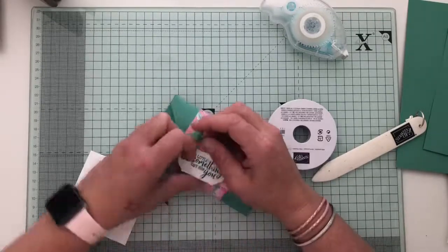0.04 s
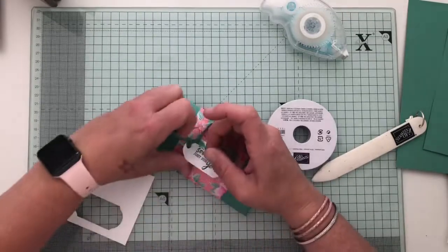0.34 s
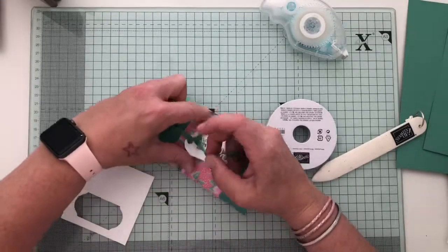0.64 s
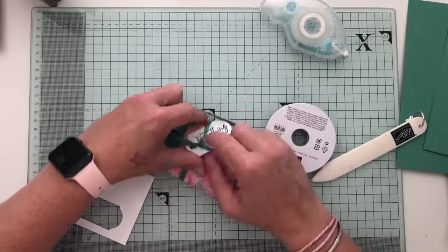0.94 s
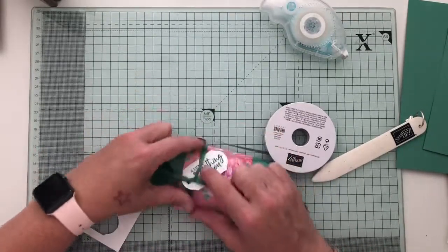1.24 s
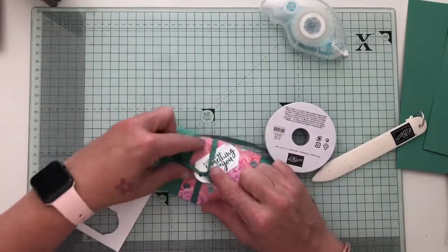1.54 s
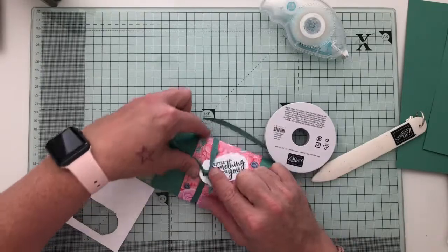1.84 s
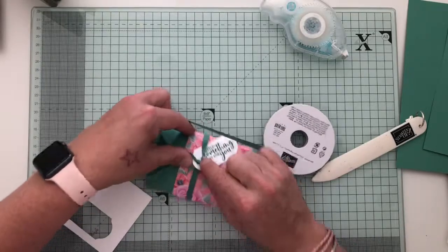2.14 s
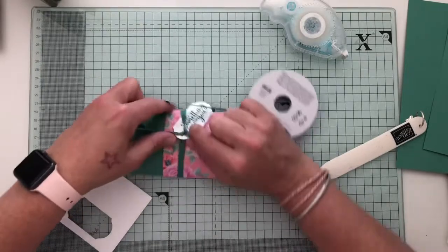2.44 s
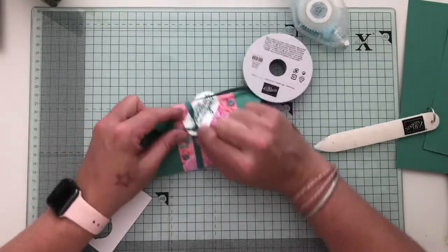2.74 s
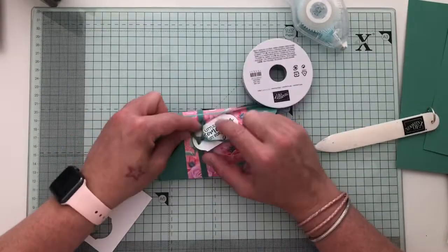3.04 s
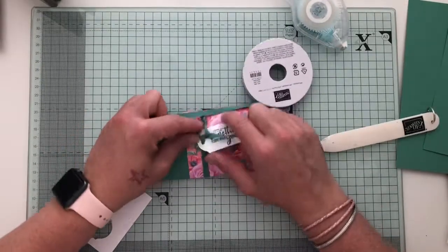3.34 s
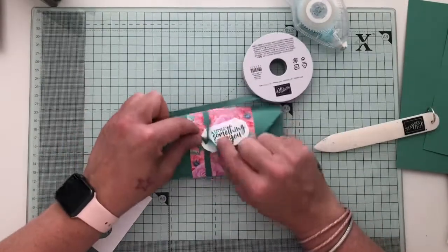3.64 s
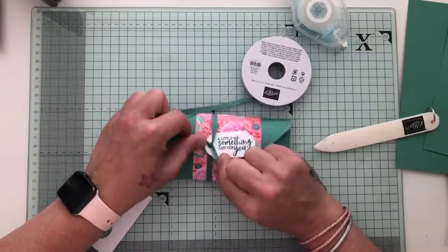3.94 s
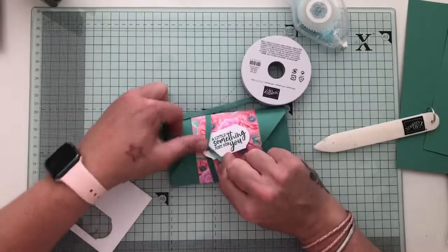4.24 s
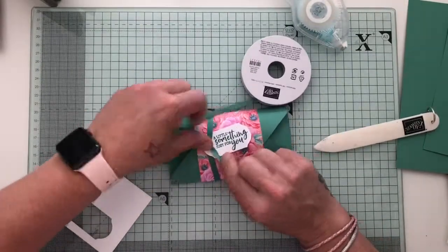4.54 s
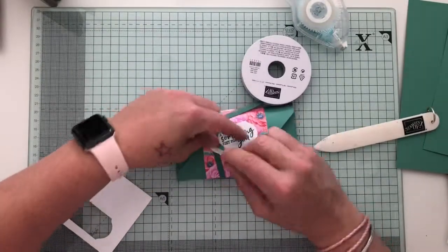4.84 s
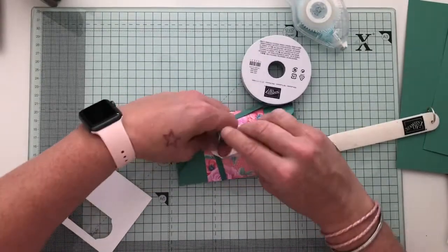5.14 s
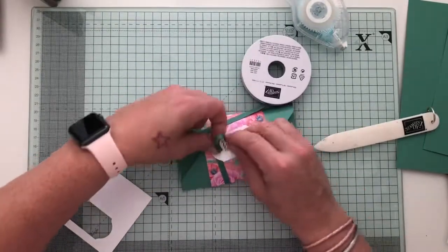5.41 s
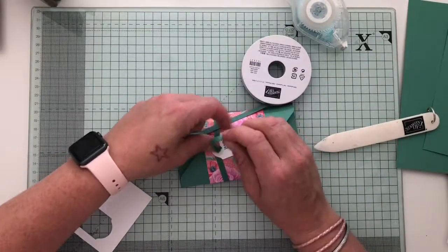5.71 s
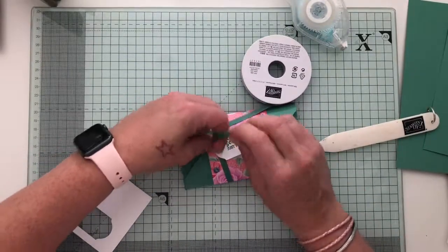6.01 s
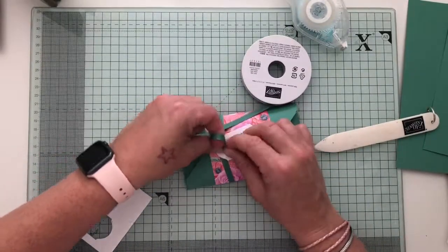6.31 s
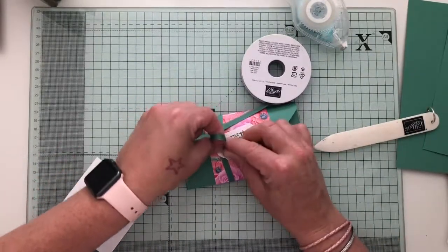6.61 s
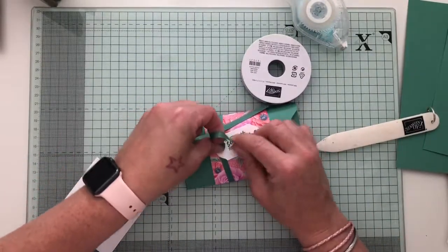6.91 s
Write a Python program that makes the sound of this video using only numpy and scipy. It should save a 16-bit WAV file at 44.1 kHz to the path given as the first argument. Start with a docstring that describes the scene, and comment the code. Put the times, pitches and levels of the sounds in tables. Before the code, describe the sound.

Hands tie ribbon around a card box, rustling and tapping, while something plastic ticks and clacks down three times.

```python
"""A small, dry room: close to the microphone, hands tie a ribbon round a card box on a cutting mat.
Stick-slip friction makes card and ribbon rub and crackle. The box knocks on the table, whose top booms
in its low modes, and card edges snap off fingernails. Something of hard plastic, probably the ribbon
spool, ticks as it is tugged and three times clacks down sharply, ringing in damped free vibration."""
import sys
import numpy as np
from scipy import signal
from scipy.fft import rfft, irfft, next_fast_len
from scipy.io import wavfile
from scipy.ndimage import map_coordinates

SR = 44100
rng = np.random.default_rng(int(sys.argv[2]) if len(sys.argv) > 2 else 0)


def wav_record(signal):
    """Record a signal, one row per channel, as 16-bit PCM in the file named by sys.argv[1]."""
    frames = np.transpose(np.atleast_2d(signal))
    bounded = np.clip(frames, -1, 1)
    # unit amplitude maps onto the largest positive 16-bit level
    quanta = np.round(bounded * 32767).astype(np.int16)
    wavfile.write(sys.argv[1], SR, quanta)


N = 316197
T = np.arange(SR // 3) / SR  # time within one contact, t/s

# Levels in the tables are relative; each source applies its own gain.
# spectrum of the room's background: f/Hz, level/dB
AIR_SPECTRUM = [(15, -42.5), (25, -0.5), (80, 4), (354, -0.5), (863, -8.5), (1040, -3.5), (1160, -15.5),
                (1260, -7), (2000, -18.5), (2550, -10), (2840, -17), (11600, -22.5), (14800, -18),
                (16000, -22.5)]
# faint rub of the hands holding the box: t/s, level/dB
HOLDING_LEVELS = [(0, -65.5), (.95, -72), (1.3, -64), (2.85, -61.5), (3.1, -76), (4.3, -76.5), (5, -78),
                  (5.6, -74.5), (6.2, -80.5), (7.17, -88)]
# finger slides over card and ribbon: start t/s, duration/s, rub level/dB, hiss level/dB
FINGER_SLIDES = [(-0.03, 0.11, -55.5, -68), (0.143, .15, -59.5, -60), (0.497, .34, -60.5, -63.5),
                 (0.991, 0.27, -58.5, -60), (1.317, 0.07, -58, -59.5), (1.45, 0.16, -74, -60),
                 (1.7, 0.14, -83, -61), (1.877, 0.41, -55.5, -58.5), (2.365, 0.26, -54.5, -56.5),
                 (2.675, 0.086, -62.5, -52), (2.754, 0.21, -53, -56), (2.968, 0.11, -64, -60.5),
                 (3.126, 0.33, -64.5, -60), (3.544, 0.23, -63.5, -64.5), (3.808, 0.35, -66.5, -71),
                 (4.055, 0.1, -78.5, -62.5), (4.39, 0.13, -66, -70), (4.684, 0.15, -76, -73),
                 (5.183, 0.18, -65.5, -78.5), (5.307, 0.16, -64, -68), (5.48, 0.054, -66.5, -78),
                 (5.69, 0.11, -67.5, -68.5), (5.805, 0.14, -63.5, -75.5), (5.942, 0.14, -63, -66),
                 (6.326, 0.095, -67, -80), (6.663, 0.28, -75.5, -75), (6.976, 0.25, -72.5, -70)]
# quick pulls of ribbon over a card edge: middle t/s, half duration/s, level/dB
RIBBON_PULLS = [(0.586, 0.019, -53.5), (0.649, 0.019, -50), (0.819, 0.014, -57.5), (1.735, 0.012, -54.5),
                (2.139, 0.04, -50), (2.443, 0.028, -43), (6.57, 0.022, -64), (6.856, 0.041, -67.5)]
# friction spectra of skin on card, ribbon on card and ribbon over an edge: f/Hz, level/dB
SKIN_SPECTRUM = [(50, -38), (110, -3.5), (230, -9), (330, -2.5), (420, -5), (560, -2.5), (800, -6.5),
                 (1200, -4), (1800, -10.5), (2800, -12.5), (5000, -46)]
RIBBON_SPECTRUM = [(700, -35.5), (1500, -2), (2200, -7), (2650, -10.5), (3200, -3.5), (3700, -6),
                   (4500, -2.5), (6500, -5.5), (8500, -8.5), (11000, -10.5), (15500, -13)]
PULL_SPECTRUM = [(60, -42), (200, -8), (700, 2.5), (1400, 3.5), (4500, 1), (7000, -1), (10000, -12),
                 (15000, -12)]
# knocks: the box meets the mat, or (at 0.034 s and 0.985 s) a fingertip taps it: t/s, card level/dB, thud
# level/dB, centre f/Hz
KNOCKS = [(0.034, -55, -84, 1190), (0.51, -51, -62, 930), (0.985, -51.5, -62, 704),
          (1.147, -36.5, -42.5, 2190), (1.579, -64, -51, 690), (1.661, -49.5, -54.5, 610),
          (1.8936, -44.5, -43.5, 626), (2.173, -31, -40.5, 760), (2.488, -40.5, -45.5, 464),
          (2.577, -45, -62, 980), (2.608, -51, -76, 1100), (2.839, -46, -50, 665),
          (2.928, -50, -62, 1500), (2.97, -54, -66, 900), (4.069, -42, -62.5, 779),
          (5.003, -48, -72, 1000), (6.015, -59.5, -71, 824), (6.217, -59, -65.5, 1520),
          (6.589, -58, -67.5, 653), (7.096, -60, -78.5, 454)]
# impact spectra of the box wall, an edge and the table top: f/Hz, level/dB
WALL_SPECTRUM = [(90, -65), (200, -21.5), (400, -1.5), (750, -7), (1000, 5.5), (1500, -1.5), (2150, -10),
                 (2900, -5), (4200, -15.5), (8000, -45)]
EDGE_SPECTRUM = [(500, -61), (1500, -29), (3000, 1.5), (4800, -4), (7000, -7.5), (10000, -15.5),
                 (15000, -19)]
TABLETOP_SPECTRUM = [(40, -58), (80, -19.5), (120, -1), (170, -4), (220, 0), (300, -1), (410, -11.5),
                     (510, -7.5), (700, -1), (900, -14), (1600, -39.5)]
# low modes of the table top: f/Hz, level/dB, t60/s
TABLETOP_MODES = [(144, -6.5, 0.37), (215.2, -6.5, 0.24), (285, -2, 0.1), (338, 1, 0.2), (514, -5.5, 0.13),
                  (676.5, -0.5, 0.14)]
# early reflections from table and walls: delay/s, level/dB
REFLECTIONS = [(.0026, -9), (.0045, -11.5), (.0073, -15.5)]
# reverberation time of the room: f/Hz, t60/s
REVERB_TIMES = [(150, .42), (400, 0.23), (1000, 0.2), (2800, 0.3), (7300, 0.24), (15000, 0.21)]
# snaps of card on fingernails: t/s, click level/dB, body level/dB
CARD_SNAPS = [(0.172, -42, -52), (0.5029, -39, -46.5), (0.7944, -34, -57.5), (1.9265, -30, -49),
              (2.0362, -34.5, -72), (2.386, -43, -48.5), (2.4178, -33, -54), (2.4302, -27.5, -51),
              (2.441, -25.5, -46), (2.488, -34, -34), (3.4148, -35.5, -59), (3.4259, -24.5, -32),
              (3.693, -35, -50), (3.9138, -37, -51), (5.003, -46, -49), (5.606, -35, -47.5),
              (6.341, -41.5, -47.5), (6.5524, -43.5, -54.5), (6.994, -49, -69.5)]
# spectra of a snap's click and body: f/Hz, level/dB
NAIL_SPECTRUM = [(500, -61.5), (1500, -27.5), (3000, -2), (5000, -1.5), (7500, -3), (10500, -7.5),
                 (15000, -9)]
SNAP_BODY_SPECTRUM = [(40, -14), (120, -23), (350, 2.5), (700, 4), (1500, -1), (2600, 0), (4500, -15)]
# hard blows of the plastic: t/s, ring and boom level/dB, body level/dB, treble level/dB
PLASTIC_CLACKS = [(1.092, -3, -18.5, -13), (3.487, -15.5, -27, -28), (4.44, -16.5, -28.5, -30.5)]
# spectra of a clack's body and treble: f/Hz, level/dB
CLACK_BODY_SPECTRUM = [(60, -43.5), (150, -29), (400, -23), (700, -7.5), (1200, -3), (2200, -5),
                       (3200, -1.5), (4000, -9.5), (5000, -17.5), (8000, -45)]
CLACK_TREBLE_SPECTRUM = [(1000, -60), (2400, -25.5), (4000, -9), (5200, -3.5), (6500, -3.5), (8400, -5),
                         (9400, -6.5), (10200, -8), (12300, -14), (13300, -14), (15500, -14)]
# modes of the plastic struck hard: f/Hz, level/dB, t60/s
PLASTIC_MODES = [(1280, -10, 0.16), (1630, -8.5, 0.11), (2174, -2.5, 0.13), (3100, -4.5, 0.081),
                 (3190, 6, 0.051), (4040, -8.5, 0.022), (4676, -4.5, 0.035), (5170, 0.5, 0.017),
                 (6200, 3, 0.069), (5770, -8, 0.037), (6440, -4.5, 0.017), (6770, -4.5, 0.017),
                 (6930, -5, 0.12), (7780, -8.5, 0.036), (7540, -6, 0.069), (7900, -6, 0.044),
                 (8320, 2.5, 0.027), (9980, -5, 0.075), (11430, -15.5, 0.1), (11700, -6.5, .07)]
# light ticks of the plastic: t/s, tick level/dB, body level/dB, pitch f/Hz
PLASTIC_TICKS = [(1.314, -50, -54, 3200), (1.355, -47.5, -54, 3040), (1.4657, -47, -60, 3180),
                 (1.5098, -46, -72, 3200), (1.5777, -41, -46.5, 3260), (1.6586, -42.5, -59, 3150),
                 (1.7504, -45, -70, 3020), (1.8382, -49.5, -66, 3110), (1.8954, -35, -48, 3200),
                 (2.0802, -42.5, -45, 3030), (2.5443, -39.5, -61, 3780), (2.5654, -37, -53, 3040),
                 (2.657, -38, -54, 3770), (2.665, -32, -48, 3320), (2.6993, -35, -49, 3920),
                 (2.8402, -33, -37, 3370), (2.9438, -43, -48.5, 3200), (2.9864, -35, -59, 3200),
                 (3.031, -44.5, -57, 3140), (3.0515, -40.5, -45, 3300), (3.7124, -44, -46, 3335),
                 (3.889, -36.5, -40.5, 3350), (4.4634, -34.5, -44, 3340), (4.4814, -41.5, -43, 3230),
                 (4.582, -34, -44.5, 3290), (4.6024, -38.5, -44, 3290)]
# modes of the plastic barely touched: ratio to the pitch, level/dB, t60/s
TICK_MODE_RATIOS = [(.94, -7, .026), (.98, -2, .03), (1.01, 0, .032), (1.06, -6, .024), (1.2, -12, .018)]
# spectra of a tick's scratch and body: f/Hz, level/dB
TICK_SCRATCH_SPECTRUM = [(800, -64), (1800, -14), (2600, -14), (3200, -5), (3900, -18), (4600, -15.5),
                         (9000, -49)]
TICK_BODY_SPECTRUM = [(80, -28), (300, -18), (700, 5.5), (1200, 6), (2200, 9.5), (2600, 1), (4000, -28)]


def amp(db):
    """Amplitude ratio of a level in decibels."""
    return 10 ** (np.asarray(db) / 20)


def unit(x):
    """Normalisation to rms 1."""
    return x / np.sqrt(np.mean(x ** 2) + 1e-20)


def unit_onset(x):
    """Normalisation of a contact to rms 1 over its first 10 ms."""
    return x / np.sqrt(np.mean(x[:SR // 100] ** 2) + 1e-20)


def along(points, hz):
    """Interpolation of (f/Hz, value) points on a logarithmic frequency axis."""
    f, values = np.transpose(points)
    return np.interp(np.log(hz + 1), np.log(f + 1), values)


def add(track, s, sound):
    """Superposition of a sound on the track from time s."""
    start = max(round(s * SR), 0)
    track[start:start + len(sound)] += sound[:N - start]


def fade(t, t60):
    """Exponential damping: 60 dB of decay in t60 seconds."""
    return np.exp(-np.log(1000) * t / t60)


def coloured(x, spectrum):
    """Minimum-phase filtering: folding the cepstrum makes the given gain curve causal."""
    m = 2 * next_fast_len(len(x) // 2 + 2048)
    gain = amp(along(spectrum, np.fft.rfftfreq(m, 1 / SR)))
    cepstrum = irfft(np.log(gain + 1e-6), m)
    cepstrum[1:m // 2] *= 2
    cepstrum[m // 2 + 1:] = 0
    return irfft(rfft(x, m) * np.exp(rfft(cepstrum)), m)[:len(x)]


def room_air():
    """Stationary noise: the quiet room and the microphone's own hiss, the deepest bass rolled off."""
    air = coloured(rng.standard_normal(N), AIR_SPECTRUM)
    high_pass = signal.butter(4, 36, "high", fs=SR, output="sos")
    return amp(-69.5) * unit(signal.sosfilt(high_pass, air))


def slide(t, length, attack_s=0.02, release_s=0.019, droop_db=1):
    """Envelope of one slide: linear attack, slightly sinking hold, exponential release."""
    attack = np.clip(t / attack_s, 0, 1)
    hold = amp(-droop_db * (np.clip(t / length, 0, 1) - .5))
    return attack * hold * np.exp(-np.maximum(t - length, 0) / release_s)


def wobble(knots_per_s):
    """Smooth random fluctuation: a spline through Gaussian knots."""
    knots = rng.standard_normal(int(N * knots_per_s / SR) + 4)
    return map_coordinates(knots, [np.arange(N) * knots_per_s / SR])


def stick_slips(per_second, centre_hz, spread, cycles):
    """Stick-slip motion: each release rings for a few cycles at a pitch of its own."""
    out, t = np.zeros(N), T[:SR // 30]
    for when, pitch, size, phase in rng.random((round(per_second * N / SR), 4)):
        hz = centre_hz * 2 ** (spread * np.arcsin(2 * pitch - 1))
        age = t * hz / cycles
        envelope = size ** 2 * age * np.exp(-age)
        add(out, when * N / SR, envelope * np.sin(2 * np.pi * (hz * t + phase)))
    return unit(out)


def crackle(spectrum, per_second, grain_share):
    """Friction as shot noise: fibres catch and let go in tiny bursts, over smooth noise."""
    catches = (rng.random(N) < per_second / SR) * rng.exponential(size=N)
    grains = signal.fftconvolve(catches, fade(T, t60=0.029))[:N] * rng.standard_normal(N)
    return unit(coloured(rng.standard_normal(N) + grain_share * unit(grains), spectrum))


def rubbing():
    """Sliding friction: skin on card rubs softly; ribbon hisses, catches and swells in quick pulls."""
    t = np.arange(N) / SR
    holding = amp(np.interp(t, *np.transpose(HOLDING_LEVELS)))
    power = sum(np.outer(amp([rub_db, hiss_db]), slide(t - s, length)) ** 2
                for s, length, rub_db, hiss_db in FINGER_SLIDES)
    rub_level, hiss_level = np.sqrt(power + holding ** 2)  # incoherent sources add in power
    pressure = wobble(knots_per_s=45)
    bumps = amp(-7.5) * stick_slips(per_second=60, centre_hz=560, spread=0.83, cycles=1.5)
    scratches = amp(-10.5) * stick_slips(per_second=110, centre_hz=3400, spread=.25, cycles=1.6)
    skin = crackle(SKIN_SPECTRUM, per_second=400, grain_share=0.8) + bumps
    ribbon = crackle(RIBBON_SPECTRUM, per_second=210, grain_share=0.96) + scratches
    rub = rub_level * amp(0.6 * pressure - 2.5) * skin
    hiss = hiss_level * amp(2.4 * pressure - 1.5) * ribbon
    pull_level = sum(amp(db) * np.exp(-((t - middle) / half) ** 2) for middle, half, db in RIBBON_PULLS)
    return rub + hiss + pull_level * crackle(PULL_SPECTRUM, per_second=300, grain_share=0.24)


def burst(spectrum, t60, rise_s=0.00055):
    """Modal overlap: many close, well damped modes merge into a short decay of coloured noise."""
    swell = 1 - np.exp(-T / rise_s)
    return unit_onset(coloured(rng.choice([-1, 1], len(T)) * swell * fade(T, t60), spectrum))


def ring(modes, rise_cycles):
    """Free vibration: damped modes, their strengths varying by blow; low ones build up more slowly."""
    hz, db, t60 = np.transpose(modes)[:, :, None]
    size = amp(db + 2 * rng.standard_normal(hz.shape))
    phase = 2 * np.pi * rng.random(hz.shape)
    swell = 1 - np.exp(-T * hz / rise_cycles)
    return np.sum(size * np.sin(2 * np.pi * hz * T + phase) * fade(T, t60) * swell, axis=0)


def dispersed(x, lag):
    """Dispersion of bending waves in a plate: low frequencies arrive later, in proportion to lag."""
    m = 2 * next_fast_len(len(x))
    hz = np.fft.rfftfreq(m, 1 / SR)
    group_delay = lag * np.maximum((hz + 50) ** -.5 - 2000 ** -.5, 0)
    phase = 2 * np.pi * np.cumsum(group_delay) * SR / m
    return irfft(rfft(x, m) * np.exp(-1j * phase), m)[:len(x)]


def in_room(sound, wet_db, distance_m=0.27):
    """Convolution with the room's response: reflections and a short tail, new for each contact."""
    hz, t, noise = signal.stft(rng.standard_normal(len(T)), SR, nperseg=256)
    decaying = noise * fade(t, along(REVERB_TIMES, hz)[:, None])
    tail = signal.istft(decaying, SR)[1][:len(T)] * (1 - np.exp(-T / 0.007))
    response = amp(wet_db) * tail / np.linalg.norm(tail)
    response[0] += 1  # the direct sound
    for delay, db in REFLECTIONS:
        response[round(delay * rng.uniform(.7, 1.3) * SR)] += amp(db)
    flight = round(distance_m / 343 * SR)
    return np.pad(signal.fftconvolve(sound, response)[:len(T)], (flight, 0))


def knocks(wall_centre_hz=1050, ordinary_knock_db=-48):
    """Impact on the card box, landing on the mat or tapped by a finger: its walls knock, its edge clicks and
    the table top booms just after."""
    out = np.zeros(N)
    for s, card_db, thud_db, centre_hz in KNOCKS:
        spectrum = np.array(WALL_SPECTRUM) * [centre_hz / wall_centre_hz, 1]  # each spot has its pitch
        wall = amp(card_db - 1) * burst(spectrum, t60=0.014)
        edge_db = -65.5 + 1.7 * (card_db - ordinary_knock_db)  # harder landings click more
        edge = amp(edge_db) * burst(EDGE_SPECTRUM, t60=0.012)
        thud = amp(thud_db - 4.5) * table_boom()
        add(out, s, in_room(dispersed(wall + edge + thud, lag=.12), wet_db=-8.5))
    return out


def table_boom():
    """Impulse response of the table top: a dull thud and the ring of its low modes."""
    thud = burst(TABLETOP_SPECTRUM, t60=.17, rise_s=.002)
    return thud + amp(2.5) * ring(TABLETOP_MODES, rise_cycles=2.0)


def card_snaps():
    """Sudden elastic release: a card edge flicks off a nail with a bright click and a duller body."""
    out = np.zeros(N)
    for s, click_db, body_db in CARD_SNAPS:
        click = amp(click_db - 18.5) * burst(NAIL_SPECTRUM, t60=.008, rise_s=0.00021)
        body = amp(body_db - 6) * burst(SNAP_BODY_SPECTRUM, t60=0.0062, rise_s=0.000067)
        add(out, s, in_room(click + dispersed(body, lag=.07), wet_db=-8.5))
    return out


def plastic_clacks():
    """Hard impact of plastic on the mat: crack, ring and faint boom; shorter contact sounds brighter."""
    out = np.zeros(N)
    for s, db, body_db, treble_db in PLASTIC_CLACKS:
        hardness = 2 ** ((treble_db - body_db + 1.5) / 30)  # scales the body's frequencies
        spectrum = np.array(CLACK_BODY_SPECTRUM) * [hardness, 1]
        body = amp(body_db - 5) * burst(spectrum, t60=0.036, rise_s=0.001)
        treble = amp(treble_db - 5) * burst(CLACK_TREBLE_SPECTRUM, t60=0.018, rise_s=.0008)
        tone = amp(db - 20) * unit_onset(ring(PLASTIC_MODES, rise_cycles=3.8))
        thud = amp(db - 44.5) * table_boom()
        add(out, s, in_room(body + treble + tone + thud, wet_db=-11.5))
    return out


def plastic_ticks():
    """Resonance: light tugs excite a cluster of high modes; stronger ones scratch more broadly."""
    out = np.zeros(N)
    for s, db, body_db, pitch_hz in PLASTIC_TICKS:
        noise_share = np.interp(db, [-45, -30], [.15, .6])
        modes = np.array(TICK_MODE_RATIOS) * [pitch_hz, 1, 1]
        tone = np.sqrt(1 - noise_share) * unit_onset(ring(modes, rise_cycles=1.5))
        scratch = np.sqrt(noise_share) * burst(TICK_SCRATCH_SPECTRUM, t60=0.024)
        edge = amp(-10) * burst(EDGE_SPECTRUM, t60=0.05)
        body = amp(body_db - 7) * burst(TICK_BODY_SPECTRUM, t60=0.054)
        add(out, s, in_room(amp(db - 9) * (tone + scratch + edge) + body, wet_db=-11.5))
    return out


def scene():
    """Linear superposition of all sources in one channel."""
    contacts = plastic_clacks() + knocks() + plastic_ticks() + card_snaps()
    return (contacts + rubbing() + room_air())[None]


def record(dry):
    """Band limiting: a steep low-pass removes the highest treble."""
    cutoff_hz = 15900
    m = next_fast_len(N + SR // 2)
    hz = np.fft.rfftfreq(m, 1 / SR)
    return irfft(rfft(dry, m) / np.sqrt(1 + (hz / cutoff_hz) ** 160), m)[..., :N]


dry = scene()
out = record(dry)
wav_record(out)
```